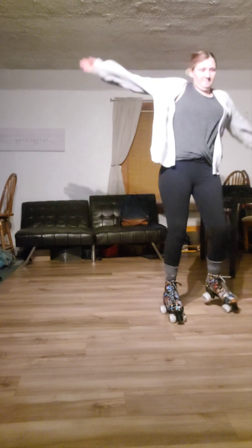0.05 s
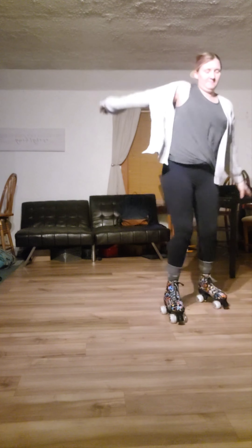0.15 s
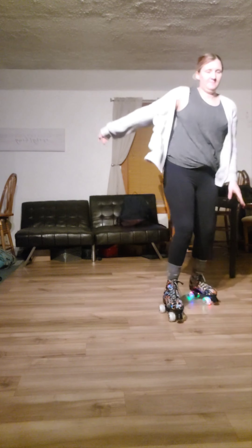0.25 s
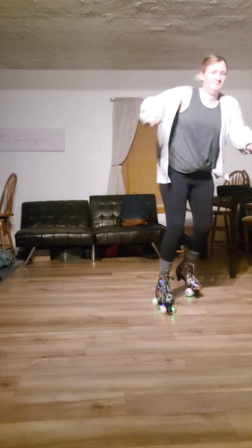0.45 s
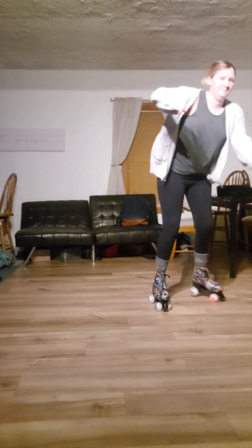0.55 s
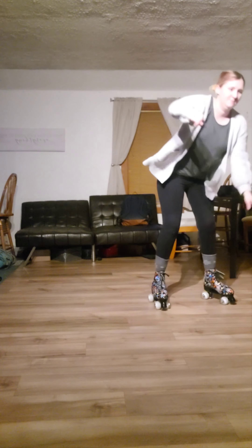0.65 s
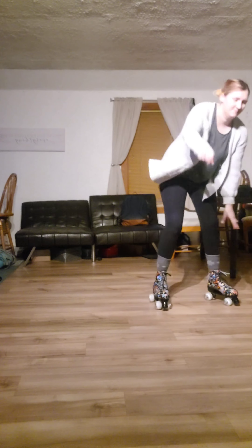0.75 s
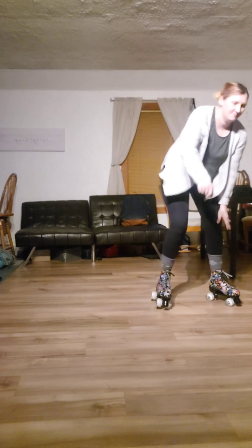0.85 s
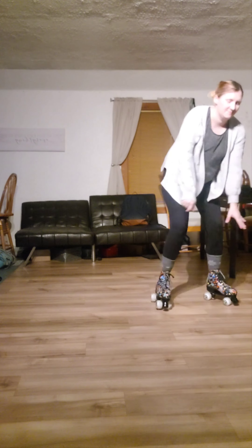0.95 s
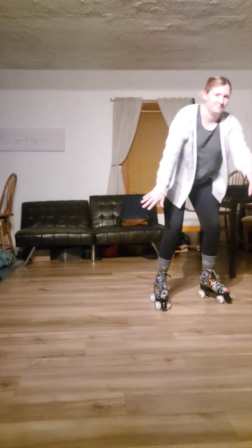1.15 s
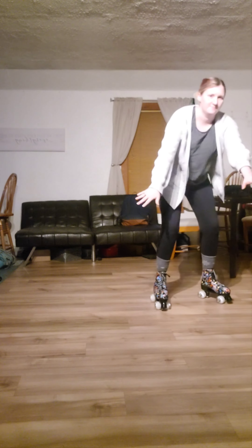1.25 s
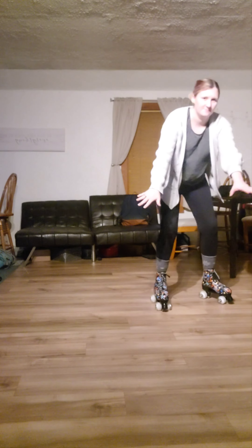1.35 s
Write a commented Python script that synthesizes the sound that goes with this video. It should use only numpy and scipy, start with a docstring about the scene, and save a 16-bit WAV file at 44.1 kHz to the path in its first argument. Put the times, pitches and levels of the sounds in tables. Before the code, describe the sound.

Roller skates knock and thump twice on a wooden floor, with faint rolling between.

```python
"""A roller skate strikes a wooden floor twice, wheel after wheel, as a skater catches her balance.
Each impact excites the skate's resonances and a short note in the board, and her weight drives
the floor's low modes into a boom. Between impacts, loose skate parts tick, the bearings hiss and
the wheels rumble. The quiet living room reverberates briefly over still air and a faint hum."""
import sys
import numpy as np
from scipy import signal
from scipy.fft import rfft, irfft
from scipy.io import wavfile
from scipy.ndimage import uniform_filter1d

SR = 44100
rng = np.random.default_rng(int(sys.argv[2]) if len(sys.argv) > 2 else 0)


def digitize_waveform(pressure):
    """Quantize a signal to 16-bit integers and store it at the path in sys.argv[1].

    Rows of a 2-D input are taken as channels; values are limited to [-1, 1].
    """
    field = np.atleast_2d(pressure).T
    bounded = np.clip(field, -1, 1)
    quanta = np.round(bounded * 32767).astype(np.int16)
    wavfile.write(sys.argv[1], SR, quanta)


N = 61739
TIME, FREQS = np.arange(N) / SR, np.fft.rfftfreq(N, 1 / SR)
BASS_LIMIT_HZ = 700

# Wheel impacts: (time [s], contact time [s], thud [dB], knock [dB], clack [dB], click [dB],
# board note [Hz], note level [dB], reverberation level [dB])
WHEEL_IMPACTS = [(0.2048, 0.01, -42, -35, -43, -52, 525, -27.5, -5),
                 (0.2111, 0.0069, -27, -45.5, -39.5, -37, 597, -34.5, -4),
                 (0.249, 0.0062, -30, -41.5, -41, -53.5, 236, -35.5, -5),
                 (0.322, 0.015, -40, -40, -71, -70, 343, -38, -3),
                 (0.569, 0.0033, -51.5, -51, -59, -60.5, 356, -40, -5),
                 (0.709, 0.0084, -36.5, -53.5, -54.5, -42.5, 400, -57, -5.5),
                 (0.7254, 0.0078, -27.5, -38.5, -42, -45, 400, -30.5, -6.5),
                 (0.7464, .005, -30.5, -30.5, -41, -56, 441, -32, -6),
                 (0.760, 0.0039, -38.5, -37.5, -61, -61, 529, -35, -5.5),
                 (1.28, 0.023, -44, -53.5, -77, -98, 376, -43.5, -2.5)]
# Bands of the thud, knock, clack and click: (frequency [Hz])
IMPACT_BANDS = [140, 480, 2000, 7000]
# Spectral envelope common to all impacts: (frequency [Hz], gain [dB])
IMPACT_SPECTRUM = [(25, -5), (70, -4), (130, 7.5), (185, 5), (270, -2.5), (400, 5), (550, 2), (720, 1),
                   (900, 2.5), (1200, 1.5), (2000, 3), (3200, 1), (4300, -2.5), (7500, -0.5),
                   (10000, -10.5), (13000, -19), (16000, -31)]
def wheel_strikes(crack_db=-4.5):
    """Impact excitation: each wheel gives a broadband blow, shaped by the skate, and a board note."""
    out = np.zeros((2, N))
    bandwidth_hz = np.clip(FREQS, IMPACT_BANDS[0], IMPACT_BANDS[2])
    density_db = 10 * np.log10(SR / 2 / bandwidth_hz)  # band level to spectral density
    shared_db = curve(IMPACT_SPECTRUM) + density_db + skate_resonance_db()
    for start, contact_s, *bands_db, note_hz, note_db, room_db in WHEEL_IMPACTS:
        own_db = curve(list(zip(IMPACT_BANDS, bands_db)))
        blow = causal_filter(reverberant_crack(contact_s, crack_db, room_db), amp(own_db + shared_db))
        add(out, start, blow + amp(note_db) * board_note(note_hz))
    return out


# Modes of the skate's plate and wheels: (frequency [Hz], gain [dB])
SKATE_RESONANCES = [(1179, 2), (1282, 2), (2541, -19), (2928, 2.5), (3300, 5.5), (4890, 5.5), (6400, -3),
                    (7702, -22)]
def skate_resonance_db(width_hz=48):
    """Modal response: the skate imposes narrow peaks and dips on whatever shakes it."""
    return sum(db * resonance(hz, width_hz) for hz, db in SKATE_RESONANCES)


def board_note(hz, t60=0.071, rise_s=0.0017):
    """Damped free vibration: the struck board sounds one short, hollow note."""
    return damped_sine(hz, t60) * onset(rise_s)


# Weight landing on the floor: (time [s], level [dB], most excited frequency [Hz], decay time [ratio])
FOOTFALLS = [(0.0, -40, 149, 0.38), (0.045, -43.5, 53, 0.45), (0.203, -23, 140, 0.46),
             (0.214, -13, 77.8, 1.0), (0.256, -19, 180, 0.94), (0.327, -22.5, 57.4, 0.52),
             (0.437, -35.5, 63.4, 0.59), (0.488, -38.5, 115, 1), (0.584, -29, 90, 0.45),
             (0.713, -37, 113, 0.21), (0.746, -13.5, 147, 0.63), (0.7605, -17.5, 99, 0.5),
             (1.03, -37.5, 57.4, 0.72), (1.285, -34, 146, 0.72)]
# Low modes of the floor: (frequency [Hz], level [dB], decay time T60 [s])
FLOOR_RESONANCES = [(36.7, 1.5, 0.64), (63.03, 0.5, 0.44), (71.1, -7, 0.22), (82.3, -4.5, 0.267),
                    (94, -29, 0.15), (119, -8, .3), (133.3, -6.5, 0.29), (169, -6, 0.31),
                    (220.1, -12.5, 0.45)]
def floor_boom(spot_octaves=0.52, rise_s=0.006):
    """Modal superposition: each landing spot favours some floor modes, and a planted foot damps them."""
    out = np.zeros((2, N))
    for start, db, spot_hz, decay_ratio in FOOTFALLS:
        modes = np.zeros(N)
        for hz, mode_db, t60 in FLOOR_RESONANCES:
            coupling = 1 / (1 + (np.log2(hz / spot_hz) / spot_octaves) ** 2)
            modes += amp(mode_db) * coupling * damped_sine(hz, t60 * decay_ratio)
        add(out, start, amp(db) * modes * onset(rise_s))
    return out


# Ticks of loose skate parts: (time [s], level [dB], lower resonance [Hz], upper resonance [Hz],
# upper relative to lower [dB], bandwidth [Hz])
PART_TICKS = [(0.085, -54.5, 3900, 8100, 2, 1510), (0.122, -60.5, 3530, 4140, -2, 700),
              (0.565, -44, 1640, 1880, -4.5, 410), (0.573, -61, 7630, 8250, -8, 600),
              (1.026, -58, 3050, 4950, 0, 300), (1.136, -66.5, 2930, 3380, 5, 397)]
def loose_parts():
    """Heavily damped resonance: each tick of a loose part excites two broad peaks."""
    out = np.zeros((2, N))
    for start, db, low_hz, high_hz, high_db, width_hz in PART_TICKS:
        response = unit_rms(resonance(low_hz, width_hz) + amp(high_db) * resonance(high_hz, width_hz))
        crack = reverberant_crack(contact_s=0.0058, crack_db=1, tail_db=-6)
        add(out, start, amp(db) * causal_filter(crack, response))
    return out


# Envelopes of the rolling noise: (time [s], hiss level [dB], rumble level [dB])
ROLLING_LEVELS = [(0, -59, -40), (0.07, -64, -49.5), (0.18, -62, -54), (0.3, -54.5, -28.5),
                  (0.42, -59.5, -42), (0.46, -55.5, -39), (0.6, -58.5, -51.5), (0.692, -57, -46),
                  (0.85, -64, -46), (0.97, -64, -47), (1.13, -66, -53), (1.238, -69.5, -60),
                  (1.4, -73.5, -51)]
# Bearing hiss: (frequency [Hz], relative spectral density [dB])
HISS_SPECTRUM = [(100, 1), (400, 13.5), (1000, 4), (2000, 5), (3500, -0.5), (5500, 0), (8000, -1),
                 (10500, -8), (16000, -15.5)]
# Rumble in the boards: (frequency [Hz], relative spectral density [dB])
RUMBLE_SPECTRUM = [(20, -10.5), (40, 6.5), (60, -20), (90, -3.5), (130, -21), (250, -25.5), (500, -31.5),
                   (1200, -47), (4000, -90)]
def rolling_wheels(grit_db=1, grit_s=0.014, resonance_share=0.23):
    """Random excitation: bearings hiss grittily through the skate while the wheels shake the boards."""
    times, hiss_db, rumble_db = np.transpose(ROLLING_LEVELS)
    flutter_db = grit_db * fluctuation(N, grit_s * SR)
    hiss = shaped_noise(HISS_SPECTRUM) * amp(np.interp(TIME, times, hiss_db) + flutter_db)
    rumble = shaped_noise(RUMBLE_SPECTRUM) * amp(np.interp(TIME, times, rumble_db))
    return causal_filter(hiss, amp(resonance_share * skate_resonance_db())) + rumble


# Reverberation of the room: (frequency [Hz], decay time T60 [s])
ROOM_DECAY = [(60, 0.23), (150, 0.32), (400, 0.31), (1000, 0.37), (2500, 0.38), (6000, 0.29), (14000, 0.19)]
def reverberant_crack(contact_s, crack_db, tail_db):
    """Reverberation: a scuffing crack leaves a tail in which each band decays at its own rate."""
    hz, frame_s, frames = signal.stft(diffuse_field(), SR, nperseg=256)
    decay = amp(-60 * frame_s / curve(ROOM_DECAY, hz)[:, None])
    tail = signal.istft(frames * decay, SR, nperseg=256)[1][:, :N]
    progress = 2 * TIME / contact_s  # 1 at mid-contact, where the crack peaks
    crack = diffuse_field() * (progress * np.exp(1 - progress)) ** 2
    return amp(crack_db) * crack + amp(tail_db) * tail * onset(0.54 * contact_s)


# Still air in the room: (frequency [Hz], relative spectral density [dB])
AIR_SPECTRUM = [(20, 6), (100, -11.5), (200, -5.5), (400, -3.5), (700, -12.5), (1100, -17.5), (3000, -21.5),
                (8000, -40.5), (16000, -37.5)]
def room_tone(air_db=-62, hum_db=-72, hum_hz=827.6, drift_hz=10.1, drift_s=0.014):
    """Ambient noise: still air and a faint hum that wavers by random frequency modulation."""
    pitch_hz = hum_hz + drift_hz * fluctuation(N, drift_s * SR)
    hum = np.sin(2 * np.pi * np.cumsum(pitch_hz) / SR)
    return amp(air_db) * shaped_noise(AIR_SPECTRUM) + amp(hum_db) * unit_rms(hum)


# Likeness of the sound at the two ears: (frequency [Hz], coherence [0-1])
EAR_COHERENCE = [(140, 0.97), (250, 0.88), (500, 0.82), (1000, 0), (4000, 0.07), (14000, 0)]
def diffuse_field():
    """Interaural coherence: noise is even and alike in the bass, speckled and unrelated in the treble."""
    even = raw = rng.standard_normal((2, N))
    for _ in range(2):  # flatten the short-time magnitudes, keeping the phases
        frames = signal.stft(even, nperseg=512)[2]
        even = signal.istft(frames / (abs(frames) + 1e-12), nperseg=512)[1][:, :N]
    mid, side = np.where(FREQS < BASS_LIMIT_HZ, rfft(unit_rms(even)), rfft(raw))
    coherence = curve(EAR_COHERENCE)
    mid *= np.sqrt((1 + coherence) / 2)
    side *= np.sqrt((1 - coherence) / 2)
    return irfft(np.array([mid + side, mid - side]), N)


def shaped_noise(spectrum):
    """Spectral shaping: stationary stereo noise of rms 1 with the given spectrum."""
    return unit_rms(irfft(rfft(diffuse_field()) * amp(curve(spectrum)), N))


def causal_filter(x, gain):
    """Minimum-phase filtering: the folded cepstrum turns a gain per frequency into a causal response."""
    fold = np.zeros(N)
    fold[0], fold[1:N // 2] = 1, 2
    cepstrum = irfft(np.log(gain + 1e-7), N)
    response = irfft(np.exp(rfft(cepstrum * fold)), N)
    return signal.fftconvolve(x, response[None, :N // 8], axes=1)[:, :N]


def resonance(hz, width_hz):
    """Lorentzian resonance curve of height 1."""
    return 1 / (1 + (2 * (FREQS - hz) / width_hz) ** 2)


def damped_sine(hz, t60):
    """Exponential decay of one mode, by 60 dB in t60 seconds."""
    return np.sin(2 * np.pi * hz * TIME) * np.exp(-np.log(1000) * TIME / t60)


def onset(rise_s):
    """First-order rise from 0 to 1."""
    return 1 - np.exp(-TIME / rise_s)


def fluctuation(count, span):
    """Moving average of white noise over span points, at rms 1."""
    return unit_rms(uniform_filter1d(rng.standard_normal(count), int(span)))


def curve(points, hz=FREQS):
    """Interpolation on a log-frequency axis."""
    knots_hz, values = np.transpose(points)
    return np.interp(np.log(hz + 1), np.log(knots_hz + 1), values)


def amp(db):
    """Amplitude ratio of a level in decibels."""
    return 10 ** (np.asarray(db) / 20)


def unit_rms(x):
    """Normalisation to rms 1."""
    return x / np.sqrt(np.mean(x ** 2) + 1e-20)


def add(mix, start_s, sound):
    """Superposition of a delayed sound on the mix."""
    part = mix[:, round(start_s * SR):]
    part += sound[..., :part.shape[1]]


# Interaural level difference: (frequency [Hz], left minus right [dB])
EAR_BALANCE = [(100, -0.56), (250, 0), (500, -2), (1000, -1), (3000, -0.5), (8000, -2.5), (13000, 1.5)]
def scene(ripple_db=1.1, ripple_width_hz=70):
    """Linear superposition: the sources sum, leaning slightly right, and the room ripples the treble."""
    mix = wheel_strikes() + floor_boom() + loose_parts() + rolling_wheels() + room_tone()
    lean_db = curve(EAR_BALANCE) / 2
    ripple = fluctuation(len(FREQS), ripple_width_hz / FREQS[1]) * (FREQS > 2 * BASS_LIMIT_HZ)
    return irfft(rfft(mix) * amp([lean_db, -lean_db]) * amp(ripple_db * ripple), N)


def record(dry):
    """Band limiting: a linear-phase low-pass filter removes the highest treble."""
    lowpass = signal.firwin(511, cutoff=15850, window=("kaiser", 9), fs=SR)
    return signal.oaconvolve(dry, lowpass[None], "same")


dry = scene()
out = record(dry)
digitize_waveform(out)
```